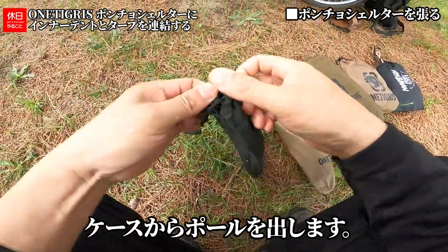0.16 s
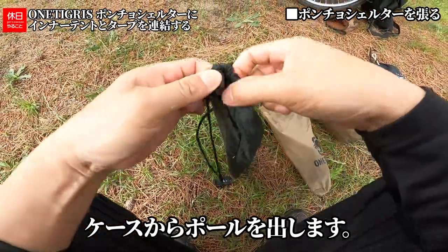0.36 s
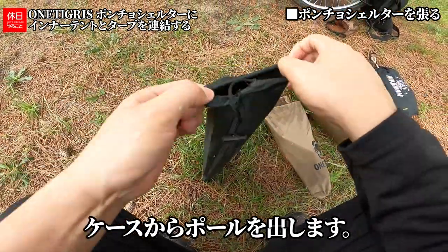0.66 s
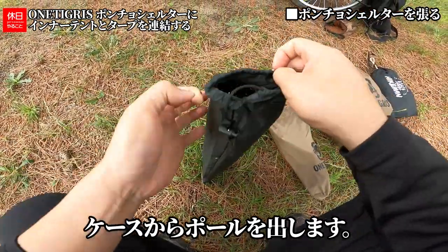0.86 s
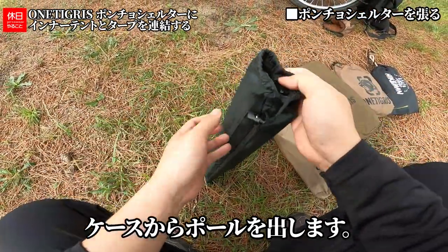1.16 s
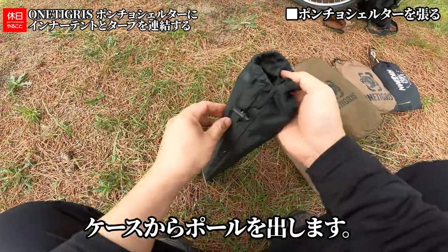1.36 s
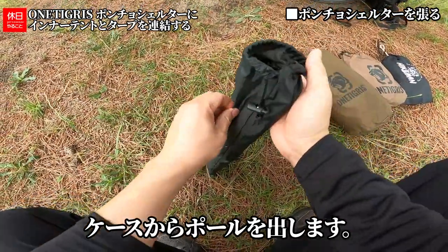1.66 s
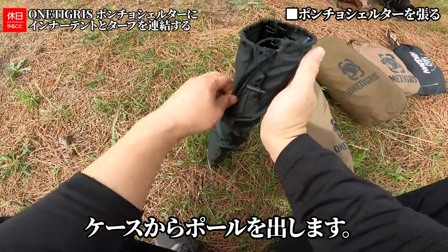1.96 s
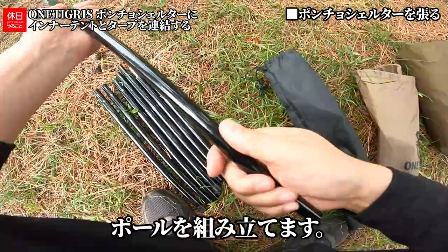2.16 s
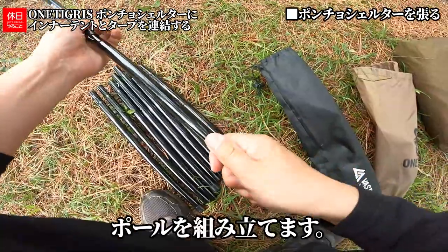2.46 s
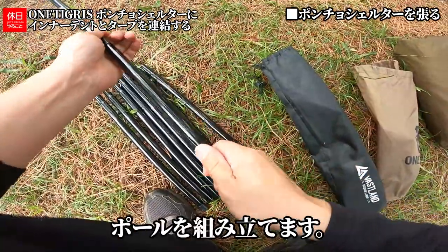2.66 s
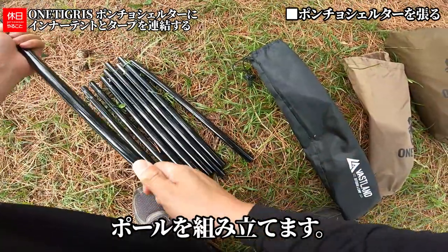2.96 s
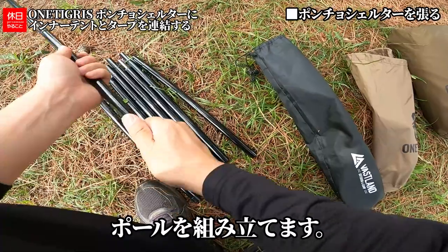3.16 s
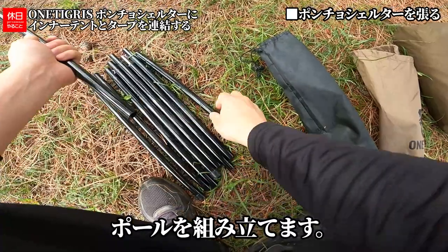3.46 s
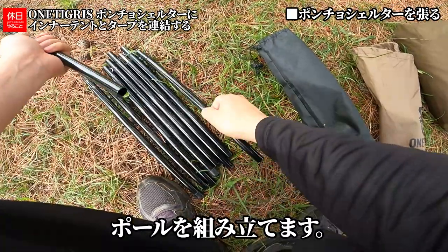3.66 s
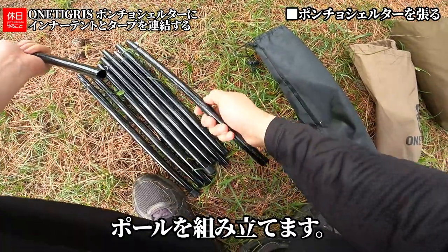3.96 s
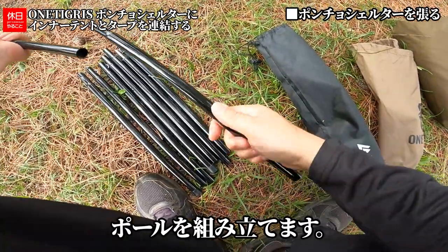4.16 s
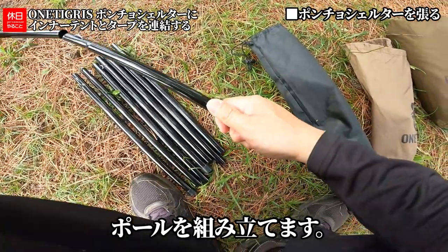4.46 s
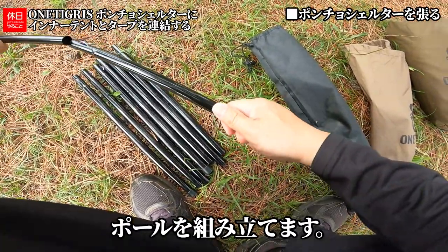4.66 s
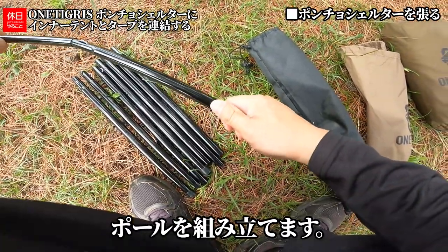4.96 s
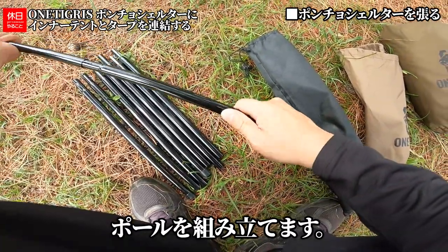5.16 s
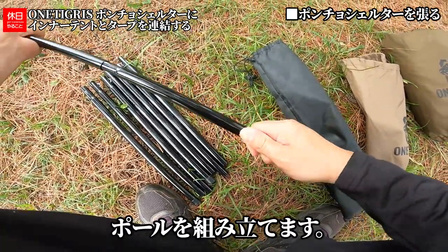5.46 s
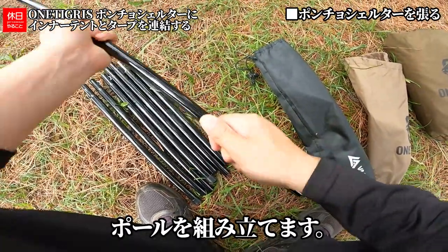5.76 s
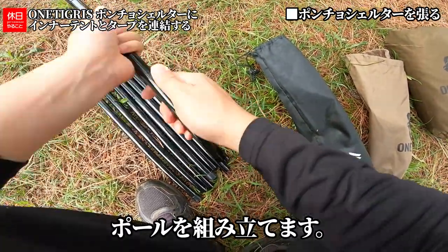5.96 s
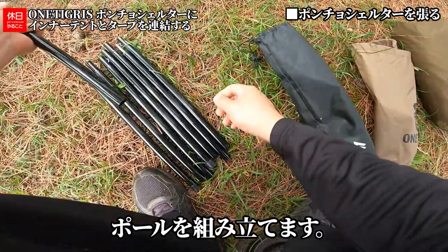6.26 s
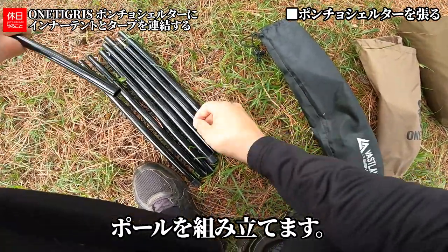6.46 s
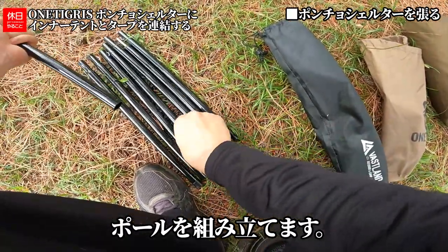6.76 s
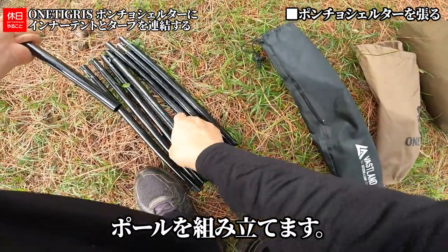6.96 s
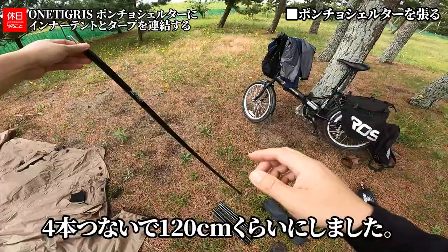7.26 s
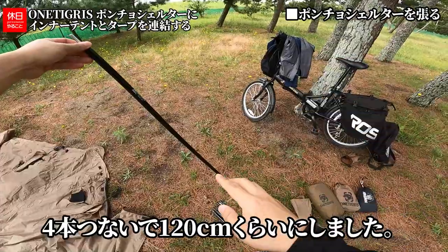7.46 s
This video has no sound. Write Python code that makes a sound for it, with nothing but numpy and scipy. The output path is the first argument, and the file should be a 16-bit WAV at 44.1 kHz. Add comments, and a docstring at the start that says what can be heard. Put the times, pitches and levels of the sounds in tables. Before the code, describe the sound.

Metal tent pole sections clatter in a rustling nylon bag, then scrape and snap together while faint birds sing over a low outdoor rumble.

```python
"""First, aluminium tent pole sections clatter and rub in a rustling nylon bag, ringing in their bending
modes, while birds sing in the pines over a distant rumble. The sound breaks off and returns with a low hum.
Then a sleeve brushes and the sections are pushed together: tips tick on sockets, scrape in and seat
with a snap that rings the longer pole. After a last clink the sound breaks off again
and comes back in a breeze."""
import sys
import numpy as np
from scipy import signal
from scipy.fft import rfft, irfft, next_fast_len
from scipy.io import wavfile
from scipy.ndimage import uniform_filter1d, map_coordinates

SR = 44100
rng = np.random.default_rng(int(sys.argv[2]) if len(sys.argv) > 2 else 0)


def dump_mix(stems):
    """Bounce the given channels to the path in sys.argv[1] as a 16-bit WAV at rate SR."""
    frames = np.atleast_2d(stems).T  # one column per channel
    limited = np.clip(frames, -1, 1)  # hard clip at full scale
    pcm = np.round(limited * 32767).astype(np.int16)
    wavfile.write(sys.argv[1], SR, pcm)


N = 335601


def amp(db):
    """Decibels to amplitude gain."""
    return 10 ** (np.asarray(db) / 20)


def unit(x):
    """Scale to rms 1."""
    return x / np.sqrt(np.mean(x ** 2) + 1e-20)


def along(points, hz):
    """Interpolate (frequency_hz, value) points on a log frequency axis."""
    knots_hz, values = np.transpose(points)
    return np.interp(np.log(hz + 1), np.log(knots_hz + 1), values)


def wobble(knots_per_s, size):
    """A smooth random curve."""
    knots = rng.standard_normal(int(size * knots_per_s / SR) + 4)
    return map_coordinates(knots, [np.arange(size) * knots_per_s / SR])


def filtered(x, response):
    """Linear filtering: multiply the spectrum by a frequency response."""
    size = x.shape[-1]
    padded = next_fast_len(size + 8192)
    return irfft(rfft(x, padded) * response(np.fft.rfftfreq(padded, 1 / SR)), padded)[..., :size]


def coloured(x, spectrum):
    """Spectral shaping, at rms 1."""
    return unit(filtered(x, lambda hz: amp(along(spectrum, hz))))


def tilt(hz, db_per_octave):
    """Spectral slope: harder contacts lean towards the treble."""
    return amp(db_per_octave * np.log2(np.clip(hz, 1000, 7000) / 3500))


def add(track, start_s, sound):
    """Superpose a sound on a track."""
    part = track[..., round(start_s * SR):][..., :sound.shape[-1]]
    part += sound[..., :part.shape[-1]]


def stereo(pair, side_db):
    """Left and right as sum and difference of a middle and a weaker side signal."""
    side = amp(side_db) * pair[1]
    return np.array([pair[0] + side, pair[0] - side])


# loose sections colliding: start_s, level_db, tilt_db_per_octave, main_mode_db, contact_count
COLLISIONS = [(0.076, -20, -4, 0, 3), (0.108, -17, -6, -1, 2), (0.325, -22.5, -3, 5.5, 1),
              (0.5, -20.5, -3.5, 9.5, 1), (0.605, -25.5, 0.5, -4, 3), (0.6846, -9, -2, 3, 3),
              (0.708, -13.5, -3, 3, 2), (0.788, -19.5, -2, -4.5, 3), (0.831, -9, 1.5, 3.5, 4),
              (0.878, -16.5, -1.5, 0.5, 1), (0.9536, -14, -2, -1, 2), (1.026, -22.5, -3.5, 11, 1),
              (1.067, -22.5, -2, -1, 1), (1.082, -18, -2.5, 3.5, 3), (1.357, -19, -2, 6, 1),
              (1.458, -19, -5.5, 6.5, 2), (1.481, -11, 2.5, 7, 3), (1.549, -13, 1.5, 7, 3),
              (1.574, -9, 0.5, 4.5, 3), (1.612, -28.5, 2.5, 2.5, 1), (1.631, -23, -7, 0.5, 1),
              (1.8602, -11, -1.5, 23, 2), (1.876, -7, 3, 4, 3), (3.665, -38.5, 9, -13, 1),
              (3.788, -35.5, 3, -11.5, 3), (6.724, -36, -1.5, -21.5, 1), (6.756, -38.5, -3, -27, 1),
              (6.872, -29, 4, -24, 2), (7.082, -26.5, 1.5, 12, 1), (7.091, -17.5, 3.5, 20.5, 1),
              (7.115, -16, 1, 14, 1)]
def contacts(spacing_s=.0085, scatter=0.1587, loss_db=4.5):
    """Inelastic collision: a knock is followed by quick, ever weaker rebounds."""
    hits = []
    for start, db, slope, main_db, count in COLLISIONS:
        for k in range(round(count)):
            jitter = scatter * rng.standard_normal() * (k > 0)
            hits.append((start + spacing_s * (k + jitter), db - loss_db * k, slope, main_db))
    return hits


# bending modes of a loose section: pitch_hz, level_db, t60_s
TUBE_MODES = [(679, -21, .16), (1509, -8.5, 0.034), (1843.3, 3, 0.061), (2048, -10.5, 0.044),
              (2468, -9, 0.088), (3110, -18, 0.02), (3493, 0.5, 0.046), (3559, -1, 0.045), (4180, -14, 0.3),
              (4640, -21.5, 0.014), (5433, -11.5, 0.084), (6420, -30, 0.037), (6930, -23.5, 0.13),
              (7750, -20, 0.062), (7880, -20.5, 0.052), (9280, -28, 0.081), (9920, -29, 0.096),
              (10650, -29, .08), (11900, -31.5, .09)]
MAIN_MODE_HZ = 3500
def clinks(detune=.011, crack_db=1, crack_t60=0.034, chatter_db=-15, chatter_t60=0.083,
           bundle_db=-12, bundle_t60=0.055, muffling_db_per_s=150, trim_db=-0.5):
    """Free vibration: each knock rings two slightly unlike tubes, which buzz against each other."""
    out, t = np.zeros((2, N)), np.arange(SR // 4) / SR
    hz, mode_db, t60 = np.tile(np.transpose(TUBE_MODES), 2)[:, :, None]
    is_main = np.abs(hz - MAIN_MODE_HZ) < 300
    for start, db, slope, main_db in contacts():
        pitch = hz * (1 + detune * rng.standard_normal(hz.shape))
        # the place of the contact decides which modes answer most
        strength = amp(rng.normal(0, 1.7, (2, len(hz)))) * rng.choice([-1, 1], (2, len(hz)))
        # cloth and neighbouring tubes add damping
        decay = amp(mode_db + main_db * is_main - 60 * t / t60 - muffling_db_per_s * t)
        ring = strength @ (decay * np.sin(2 * np.pi * pitch * t))
        # tubes pressed together add short-lived modes that change with every knock
        coupled_hz = 3200 * np.exp(np.clip(rng.normal(0, .45, (16, 1)), -1, 1))
        coupled = rng.standard_normal((2, len(coupled_hz))) @ np.sin(2 * np.pi * coupled_hz * t)
        ring += coupled * amp(bundle_db - 60 * t / bundle_t60)
        chatter = rng.standard_normal(len(t)) * (rng.random(len(t)) < .1)
        force = chatter * amp(chatter_db - 60 * t / chatter_t60)
        force[0] = 1  # the impact itself
        ring = signal.fftconvolve(ring, force[None], axes=1)[:, :len(t)]
        noise = rng.standard_normal((2, len(t)))
        crack = unit(filtered(noise, lambda f: amp(along(NYLON_SPECTRUM, f)) * f / (f + 2500)))
        crack *= amp(crack_db - 60 * t / crack_t60)
        knock = filtered(6 * ring / np.abs(ring[0]).max() + crack, lambda f: tilt(f, slope))
        add(out, start, amp(db + trim_db) * knock / np.abs(knock[0]).max())
    return stereo(out, side_db=-10)


def resonators(hz, modes):
    """Modal superposition: damped (centre_hz, width_hz, level_db) resonances of alternating sign."""
    return sum((-1) ** k * amp(db) * 1j * hz * width / (centre ** 2 - hz ** 2 + 1j * hz * width)
               for k, (centre, width, db) in enumerate(modes))


# resonances of the hand-held joint: centre_hz, width_hz, level_db
JOINT_MODES = [(1050, 630, -15), (1630, 300, -5), (2815, 520, 0.5), (3556, 300, 5.5), (4280, 360, -3),
               (5140, 430, -2.5), (6540, 700, -8), (7860, 1400, -16), (12500, 980, -29)]
def joint(force, slope):
    """Forced response of the joint, its resonances broadened by the damping of the hands."""
    return filtered(force, lambda hz: resonators(hz, JOINT_MODES) * tilt(hz, slope))


# a tip scraping in and snapping home: snap_s, snap_level_db, scrape_level_db, tilt_db_per_octave
PUSHES = [(2.391, -11.5, -36, -3), (2.6853, -8.5, -25, 4), (5.2554, -10, -37.5, 1), (5.6387, -7.5, -23, 4)]
def slides(lead_s=0.044, overrun_s=0.0061, swell_db=27, glide=0.27, grit_db=2.5):
    """Sliding friction: the scrape grows louder and rises in pitch as the tip runs into the socket."""
    out, size = np.zeros((2, N)), round((lead_s + overrun_s) * SR)
    remaining = np.linspace(1, 0, size)
    for snap_s, _, db, slope in PUSHES:
        scrape = joint(rng.standard_normal((2, size)), slope)
        position = np.cumsum(1 - glide * remaining ** 2)  # reading ever faster raises the pitch
        scrape = unit(np.array([map_coordinates(channel, [position]) for channel in scrape]))
        swell = amp(db - swell_db * remaining ** 2 + grit_db * wobble(230, size))
        add(out, snap_s - lead_s, scrape * swell)
    return stereo(out, side_db=-18.5)


# a tip tapping its socket or a neighbour: start_s, level_db, tilt_db_per_octave
TAPS = [(0.915, -27, -7), (1.929, -19.5, -4), (2.131, -31, -3.5), (4.875, -28.5, -10.5), (5.0178, -27, -6),
        (5.056, -36, -6), (5.241, -30.5, 4), (5.314, -27, -7), (5.548, -31.5, 2), (5.570, -23.5, 0.5),
        (6.034, -41, -1), (6.791, -42, 9)]
def taps_and_snaps(tap_attack_s=.0018, snap_attack_s=0.00068, impact_t60=0.01,
                   rattle_db=-22, rattle_t60=0.076, trim_db=-1.5):
    """Impact excitation: metal meets metal in a soft tap or a hard snap, then rattles briefly."""
    out, t = np.zeros((2, N)), np.arange(SR // 8) / SR
    taps = [(start, db, slope, tap_attack_s) for start, db, slope in TAPS]
    snaps = [(start, db, slope, snap_attack_s) for start, db, _, slope in PUSHES]
    decay = amp(-60 * t / impact_t60) + amp(rattle_db - 60 * t / rattle_t60)
    for start, db, slope, attack_s in taps + snaps:
        force = (1 - np.exp(-t / attack_s)) * decay * rng.standard_normal((2, len(t)))
        click = joint(force, slope)
        add(out, start, amp(db + trim_db) * click / np.abs(click[0]).max())
    return stereo(out, side_db=-16.5)


# the hands stopping the pole: frequency_hz, level_db
THUD_SPECTRUM = [(40, -20.5), (110, 4.5), (240, -13.5), (500, -25.5), (1200, -59.5)]
# the joined pole ringing once seated: start_s, rows of (pitch_hz, level_db, t60_s)
POLE_RINGS = [(2.393, [(243.6, -35.5, 0.54), (1830, -42, 0.11), (6780, -42, 0.12)]),
              (2.686, [(125, -19, 0.28), (237, -38.5, 0.71), (377.3, -31, 0.31), (640, -42, 0.18),
              (880, -41, 0.2), (1145, -35, 0.096), (1826, -43.5, 0.89), (1850, -19, 0.036),
              (5290, -10, 0.027), (6950, -22, 0.035)]), (5.640, [(78, -27.5, 0.11), (241.5, -29, 0.14),
              (422, -37, 0.15), (1414, -48, 0.14), (1879, -56, 0.95), (3550, -15.5, 0.031),
              (4440, -34.5, 0.091), (6730, -40.5, 0.17)])]
def seatings(attack_s=0.00053, thud_db=-30, thud_t60=0.15):
    """Natural frequencies fall with length: a seated joint thuds and rings the whole, longer pole."""
    out, t = np.zeros(N), np.arange(SR // 2) / SR
    for start, modes in POLE_RINGS:
        ring = sum(amp(db - 60 * t / t60) * np.sin(2 * np.pi * hz * t) for hz, db, t60 in modes)
        thud = coloured(rng.standard_normal(len(t)), THUD_SPECTRUM) * amp(thud_db - 60 * t / thud_t60)
        add(out, start, (ring + thud) * (1 - np.exp(-t / attack_s)))
    return out


# one section dragged along the others: start_s, end_s, level_db, tilt_db_per_octave, main_mode_db
DRAGS = [(0.062, 0.135, -35.5, 1.5, 0), (0.785, 0.843, -33.5, 0, 2.5), (1.59, 1.651, -44.5, 0.5, -3),
         (2.72, 3.01, -65, -3.5, -14.5), (3.561, 3.87, -62.5, 8, -7), (6.698, 6.875, -55.5, 2, -8),
         (6.872, 7.096, -49.5, 1.5, -11.5), (6.892, 6.971, -38.5, -2, -8), (7.08, 7.133, -28, 3.5, 5.5)]
def rubs(width_hz=32, grit_db=4, catch_db=4, singing_hz=5520, singing_db=5.5):
    """Frictional excitation: an uneven force sustains the tube modes, favouring one near singing_hz."""
    out = np.zeros((2, N))
    modes_hz, modes_db, _ = np.transpose(TUBE_MODES)
    is_main = np.abs(modes_hz - MAIN_MODE_HZ) < 300
    is_singing = np.abs(modes_hz - singing_hz) < 400
    for start, end, db, slope, main_db in DRAGS:
        levels_db = modes_db + main_db * is_main + singing_db * is_singing
        modes = [(hz, width_hz, level) for hz, level in zip(modes_hz, levels_db)]
        size = round((end - start) * SR)
        force = rng.standard_normal((2, size))
        force *= amp(grit_db * wobble(500, size) + catch_db * wobble(60, size))
        ring = unit(filtered(force, lambda hz: resonators(hz, modes) * tilt(hz, slope)))
        add(out, start, amp(db) * signal.windows.tukey(size, .5) * ring)
    return stereo(out, side_db=-11)


def rustle(strokes, spectrum, crinkle_db, flutter_db, peakedness,
           creases_per_s=82, crease_db=4, crease_spread_db=6.5):
    """Friction noise of fabric: a hiss with crackling creases swells and fades with each stroke."""
    out = np.zeros((2, N))
    for start, length, db, slope in strokes:
        size = round(length * SR)
        weave = rng.standard_normal((2, size))
        weave *= amp(crinkle_db * wobble(900, size) + flutter_db * wobble(36, size))
        is_crease = rng.random(size) < creases_per_s / SR
        creases = is_crease * amp(crease_db + crease_spread_db * rng.standard_normal(size))
        hiss = unit(filtered(weave + creases, lambda hz: amp(along(spectrum, hz)) * tilt(hz, slope)))
        add(out, start, amp(db) * hiss * signal.windows.cosine(size) ** peakedness)
    return stereo(out, side_db=-14.5)


# hiss of rubbed nylon: frequency_hz, level_db
NYLON_SPECTRUM = [(200, -25.5), (350, -11.5), (600, -9), (866, -8.5), (1110, -1.5), (1290, -6),
                  (1780, -3.5), (2950, -9.5), (3520, -6), (6850, -17), (12100, -34), (15500, -44.5)]
# hands pulling at the bag: start_s, length_s, level_db, tilt_db_per_octave
BAG_PULLS = [(0.0, 0.31, -46, -1.5), (0.3, 0.54, -42, -0.5), (0.85, 0.32, -46, -0.5), (1.15, 0.63, -51, -1),
             (1.45, 0.22, -44, 1.5), (1.74, .5, -45.5, .5)]
def nylon_bag():
    """Friction of nylon under the hands, nearly level through each pull."""
    return rustle(BAG_PULLS, NYLON_SPECTRUM, crinkle_db=1.0, flutter_db=1.1, peakedness=0.21)


# hiss of brushed cloth: frequency_hz, level_db
CLOTH_SPECTRUM = [(410, -41), (700, -12), (1130, 0.5), (1560, 0), (1800, 0.5), (2080, -3.5), (3920, 4),
                  (12100, -22), (15500, -32.5)]
# a sleeve brushing: start_s, length_s, level_db, tilt_db_per_octave
SLEEVE_STROKES = [(2.4, .32, -60.5, -4), (2.72, 0.37, -54, -2), (3.05, 0.4, -58.5, 1.5),
                  (3.45, .5, -62.5, 3.5), (4.05, 0.53, -69.5, 2.5), (4.85, 1, -66.5, -2.5),
                  (5.77, 0.31, -56.5, 4.5), (6.0, 0.46, -73.5, -1)]
def sleeve():
    """Friction of cloth, in rounded swells as the arm reaches."""
    return rustle(SLEEVE_STROKES, CLOTH_SPECTRUM, crinkle_db=2.0, flutter_db=1.5, peakedness=0.65)


def note(pitch_hz):
    """A bird's pure tone at rms 1: phase is the integral of frequency."""
    taper = signal.windows.tukey(len(pitch_hz), .5)
    return unit(taper * np.sin(2 * np.pi * np.cumsum(pitch_hz) / SR))


# one bird's buzzy calls: start_s, length_s, level_db
BUZZ_CALLS = [(1.619, 0.16, -52), (2.999, 0.11, -58.5), (3.818, 0.47, -64), (6.432, 0.36, -60.5)]
def buzzes(top_hz=4900, floor_hz=4140, sag_s=0.12, depth_hz=147, knots_per_s=280):
    """Frequency modulation: a fast random waver roughens a tone that sags in pitch."""
    out = np.zeros(N)
    for start, length, db in BUZZ_CALLS:
        t = np.arange(round(length * SR)) / SR
        pitch = floor_hz + (top_hz - floor_hz) * np.exp(-t / sag_s)
        add(out, start, amp(db) * note(pitch + depth_hz * wobble(knots_per_s, len(t))))
    return out


# slurred bird whistles: start_s, length_s, first_hz, last_hz, level_db
WHISTLE_CALLS = [(1.095, 0.31, 1415, 1190, -52.5), (3.077, 0.034, 3480, 4050, -53.5),
                 (3.261, 0.14, 3700, 4180, -55.5), (3.673, 0.096, 4000, 5300, -53),
                 (4.087, 0.07, 6100, 6250, -63.5), (4.327, .06, 4230, 2627, -58),
                 (4.398, 0.086, 2480, 3580, -62.5), (6.368, 0.078, 3530, 3910, -63.5)]
def whistles(ease=1.4):
    """Frequency glide: each whistle moves fast at first, then settles."""
    out = np.zeros(N)
    for start, length, first_hz, last_hz, db in WHISTLE_CALLS:
        slur = np.linspace(1, 0, round(length * SR)) ** ease
        add(out, start, amp(db) * note(last_hz + (first_hz - last_hz) * slur))
    return out


# bird chips, alone or in runs: start_s, first_hz, level_db, chip_count, spacing_s
CHIP_RUNS = [(1.24, 4700, -54, 2, .087), (3.399, 6550, -54, 2, .05), (3.816, 4270, -51.5, 8, .0268),
             (4.130, 5600, -52, 1, 0), (4.52, 4900, -71, 7, .102)]
def chips(length_s=0.019, fall=0.27, scatter=0.071):
    """Linear chirps: brief downward sweeps, a little unevenly spaced."""
    out = np.zeros(N)
    for start, first_hz, db, count, spacing in CHIP_RUNS:
        chip = amp(db) * note(first_hz * np.linspace(1, 1 - fall, round(length_s * SR)))
        for k in range(round(count)):
            add(out, start + (k + scatter * rng.standard_normal()) * spacing, chip)
    return out


def birds(direct_db=-4, echo_db=-2):
    """The direct-to-reverberant ratio falls with distance: far buzzes echo more than near calls."""
    far = buzzes()
    near = whistles() + chips()
    return amp(direct_db) * (near + far) + amp(echo_db) * pine_echoes(far + .45 * near)


# reverberation time among the pines: frequency_hz, t60_s
PINE_DECAY = [(300, .3), (2000, 0.22), (4500, 0.96), (12000, 0.25)]
def pine_echoes(x):
    """Scattering by trees: a diffuse tail in which each frequency dies at its own rate."""
    hz, t, bands = signal.stft(rng.standard_normal((2, SR)), SR, nperseg=256)
    decay = amp(-60 * t / along(PINE_DECAY, hz)[:, None])
    tail = signal.istft(bands * decay, SR, nperseg=256)[1]
    tail /= np.linalg.norm(tail[0])
    return stereo(signal.fftconvolve(x[None], tail, axes=1)[:, :N], side_db=-19)


def wash(spectrum, side_db):
    """Stationary noise with a given spectrum."""
    return stereo(coloured(rng.standard_normal((2, N)), spectrum), side_db)


# distant rumble, one spectrum for unpacking and one for joining: frequency_hz, level_db
RUMBLE_SPECTRA = [
    [(16, -39), (28, -1), (64, 0.5), (108, 1), (177, -7.5), (210, -5.5), (316, -14.5), (383, -14.5),
     (476, -22.5), (600, -17.5), (780, -54), (1320, -120)],
    [(16, -33), (28, 0.5), (38, -2), (54, -4), (92, -6.5), (134, -9), (251, -17), (290, -20.5),
     (335, -28.5), (411, -27), (511, -36.5), (557, -43), (693, -52), (900, -71), (1170, -68.5),
     (1980, -120)],
]
# the rumble as each stretch begins: unpacking_db, joining_db
RUMBLE_LEVELS = [-39.5, -34.5]
def rumble(unpacking, joining, since_joining_s, recede_db_per_s=1.46):
    """Low-frequency noise from afar: steady at first, receding while the poles are joined."""
    steady = amp(RUMBLE_LEVELS[0]) * wash(RUMBLE_SPECTRA[0], side_db=-30)
    easing = amp(RUMBLE_LEVELS[1] - recede_db_per_s * since_joining_s)
    receding = easing * wash(RUMBLE_SPECTRA[1], side_db=-43)
    return unpacking * steady + joining * receding


# a low outdoor hum: frequency_hz, level_db
HUM_SPECTRUM = [(30, -47), (42, -18), (48.5, 11), (55, -8.5), (75, -48.5), (150, -120)]
# the hum in the last two stretches: joining_db, ending_db
HUM_LEVELS = [-42, -26.5]
def hum(joining, ending):
    """Narrow-band noise near 48 Hz is heard as a hum, louder at the end."""
    gain = joining * amp(HUM_LEVELS[0]) + ending * amp(HUM_LEVELS[1])
    return gain * wash(HUM_SPECTRUM, side_db=-35)


# moving air: frequency_hz, level_db
BREEZE_SPECTRUM = [(16, -36), (28, -13.5), (53, 1.5), (91, -19), (161, -14.5), (219, -23), (269, -15.5),
                   (405, -30), (566, -21), (853, -24.5), (1320, -37), (1710, -34.5), (3080, -41),
                   (6670, -57), (13000, -103)]
def breeze(level_db=-27.5):
    """Wind noise, with most of its energy in the bass."""
    return amp(level_db) * wash(BREEZE_SPECTRUM, side_db=-56)


# faint outdoor hiss: frequency_hz, level_db
AIR_SPECTRUM = [(350, -26), (600, -4), (936, -10.5), (1280, -3.5), (1690, -6), (2400, -10), (3650, -11),
                (6960, -17), (8410, -39), (12300, -38.5), (15000, -48)]
def air(level_db=-70):
    """The ambient noise floor: a steady broadband hiss."""
    return amp(level_db) * wash(AIR_SPECTRUM, side_db=-11.5)


# breaks in the sound: off_s, fully_back_s
GAPS = [(2.140, 2.388), (7.123, 7.375)]
def dropouts(fade_in_s=0.054, floor_db=-56, end_fade_s=.01):
    """Amplitude gating: the gain shuts abruptly at each gap, fades back in and closes at the end."""
    t = np.arange(N) / SR
    gain = np.ones(N)
    for off, back in GAPS:
        recovery = np.clip(1 + (t - back) / fade_in_s, 0, 1) ** 2
        gain *= np.where(t < off, 1, recovery)
    gain = uniform_filter1d(np.maximum(gain, amp(floor_db)), size=64)
    return gain * np.minimum(1, (t[-1] - t) / end_fade_s)


def scene(pole_echo_db=-38):
    """Superposition: poles, fabric and birds over three stretches, each with its own background."""
    t = np.arange(N) / SR
    first_gap, second_gap = np.mean(GAPS, axis=1)
    unpacking, ending = t < first_gap, t >= second_gap
    joining = ~unpacking & ~ending
    poles = clinks() + slides() + taps_and_snaps() + seatings() + rubs()
    echoes = amp(pole_echo_db) * pine_echoes(poles[0])
    fabric = unpacking * nylon_bag() + joining * sleeve()
    drone = rumble(unpacking, joining, t - first_gap) + hum(joining, ending)
    return poles + echoes + fabric + birds() + drone + ending * breeze() + air()


# stereo difference between the microphone ports: frequency_hz, side_gain_db
PORT_DIFFERENCE = [(400, -7), (1200, -8.5), (2500, -5), (8000, -2), (12000, 8)]
def record(dry, low_cut_hz=32, top_hz=15750):
    """A small band-limited microphone, its two ports differing more for short waves; two dropouts."""
    mid, side = (dry[0] + dry[1]) / 2, (dry[0] - dry[1]) / 2
    side = filtered(side, lambda hz: amp(along(PORT_DIFFERENCE, hz)))
    left_right = np.array([mid + side, mid - side])
    heard = filtered(left_right, lambda hz: hz ** 4 / np.hypot(hz ** 4, low_cut_hz ** 4))
    return filtered(heard * dropouts(), lambda hz: hz < top_hz)


dry = scene()
out = record(dry)
dump_mix(out)
```